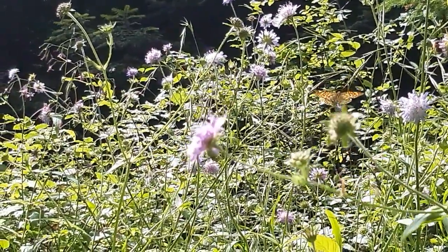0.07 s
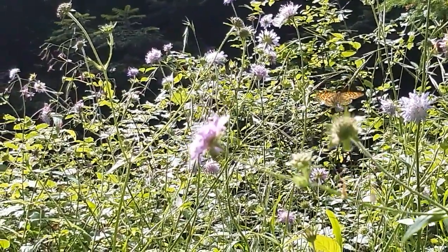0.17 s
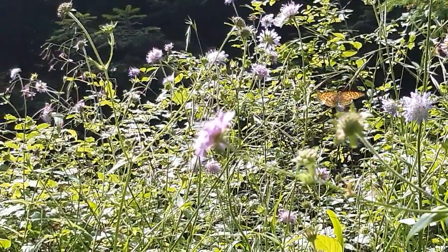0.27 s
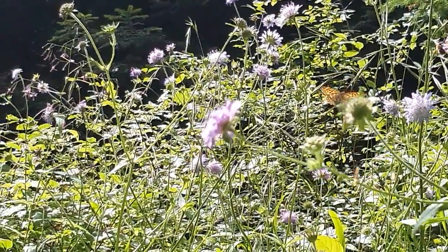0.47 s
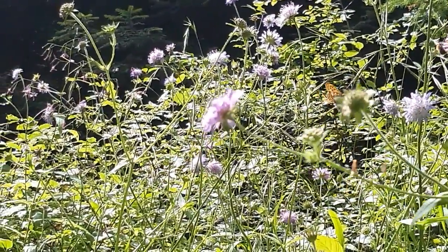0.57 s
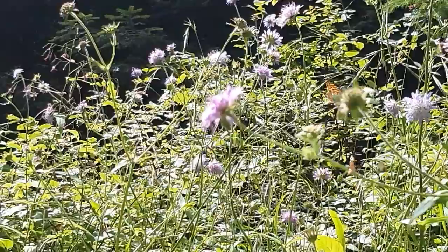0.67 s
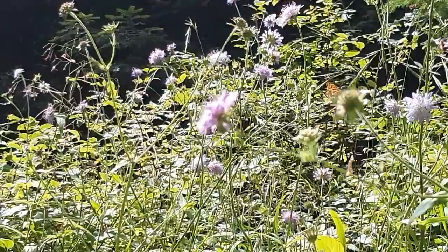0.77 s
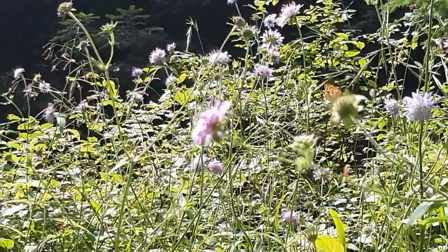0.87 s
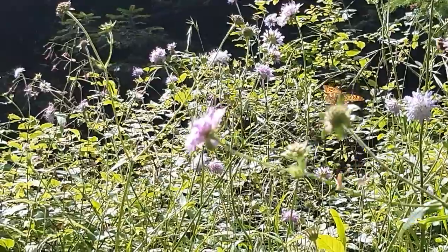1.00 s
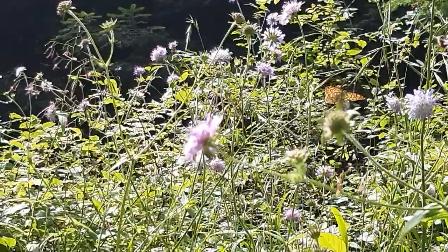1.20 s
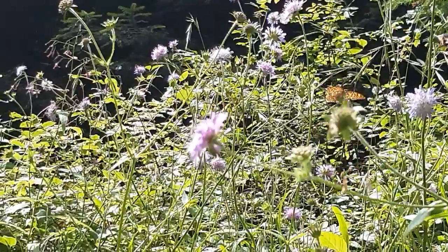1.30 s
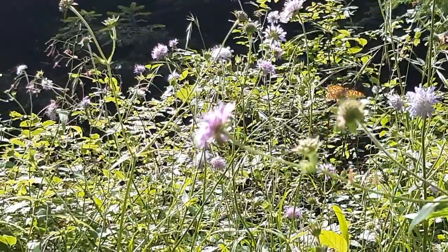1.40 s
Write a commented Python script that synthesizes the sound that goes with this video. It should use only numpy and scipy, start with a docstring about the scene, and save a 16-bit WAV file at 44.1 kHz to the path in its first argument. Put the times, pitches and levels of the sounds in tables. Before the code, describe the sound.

An insect's low, slightly raspy buzz passes close on the right, dips, swells again on the left and fades away. Behind it, light wind brushes the microphone and another insect hums faintly in a quiet meadow.

```python
"""A sunny meadow: a hoverfly or bee flies close past the right microphone port, then the left, and leaves.
Each wingbeat radiates a pressure pulse, whose repetition gives a harmonic buzz, and throws off a puff
of hiss; the wake stirs the air at the ports. A second, lower insect hums farther off,
over light wind and the faint hush of the meadow."""
import sys
import numpy as np
from scipy import signal
from scipy.fft import rfft, irfft
from scipy.io import wavfile
from scipy.ndimage import uniform_filter1d

SR = 44100
rng = np.random.default_rng(int(sys.argv[2]) if len(sys.argv) > 2 else 0)


def dump_mix(stems):
    """Bounce the given channels to the path in sys.argv[1] as a 16-bit WAV at rate SR."""
    frames = np.atleast_2d(stems).T  # one column per channel
    limited = np.clip(frames, -1, 1)  # hard clip at full scale
    pcm = np.round(limited * 32767).astype(np.int16)
    wavfile.write(sys.argv[1], SR, pcm)


N = 63945
TIME = np.arange(N) / SR
PUFF_PHASE = 0.13  # fraction of a wingbeat from pulse to puff

# Unsteadiness of flight, least in the passes, greatest hovering between them: t/s, roughness (0 to 1)
ROUGHNESS = [(0,.4),(.25,.4),(.42,.25),(.53,.6),(.72,.6),(.79,.4),(.87,.35),(.92,.45),(1.0,.5)]


def passing_insect():
    """A common source: one wingbeat phase drives the close buzz, hiss, churned air and distant buzz."""
    # Wingbeat rate: t/s, f/Hz
    wingbeat = [(0,176.3),(.16,181.6),(.19,171.1),(.225,185.3),(.26,174.4),(.3,178.8),(.38,170.1),(.455,172.1),(.53,177),(.585,169.2),(.64,173.2),(.7,162.9),(.785,180.9),(.88,172.3),(.915,158.4),(.97,178.9),(1.05,173.4),(1.45,173)]
    # Swell of the pass at each port: t/s, fundamental gain/dB, overtone gain/dB
    pass_left = [(0.3, -39, -37), (0.5, -30, -59), (0.68, -16.5, -16.5), (0.8, -1.1, -0.4), (0.87, 2.1, 0),
                 (0.92, -7.5, -2), (0.96, -25, -22.5), (1.05, -53, -52)]
    pass_right = [(0.0, -47, -36), (0.2, -14.5, -23), (0.27, -2, -7.5), (0.35, 4.7, 2.2), (0.42, 3.7, -2),
                  (0.53, -7.5, -9), (0.62, -26, -13), (0.72, -38.5, -19), (0.8, -54.5, -46),
                  (1.0, -63, -65.5)]
    # Wing pulse spectrum at closest approach: harmonic number, relative level/dB
    pulse_left = [(1,-32),(2,-35),(3,-41),(4,-54),(5,-53),(6,-55.5),(7,-58),(9,-62),(11,-67),(13,-69),(16,-77),(22,-88)]
    pulse_right = [(1,-31.5),(2,-31),(3,-37.5),(4,-45.5),(5,-48),(6,-60),(7,-48.5),(9,-59),(11,-59.5),(12,-57.5),(13,-73.5),(15,-77.5),(17,-77),(22,-86.5)]
    # Envelope of the wing hiss: t/s, relative level/dB
    hiss_left = [(0.0, -76), (0.4, -62.5), (0.72, -67.5), (0.82, -50.5), (0.92, -59.5), (1.0, -60),
                 (1.16, -76.5), (1.45, -79.58)]
    hiss_right = [(0.0, -101), (0.21, -74.741), (0.3, -55), (0.39, -51), (0.51, -58.5), (0.62, -71.209),
                  (1.0, -93), (1.45, -123)]
    # Spectrum of the wing hiss: f/Hz, relative level/dB
    colour_left = [(150,8),(500,8),(1000,4),(2200,2),(3000,-1),(4000,-2),(5000,1),(6500,2),(8500,-3),(12000,-1),(15500,0)]
    colour_right = [(150,10),(500,7),(1000,3),(2200,-1),(3000,1),(4000,0),(6500,-3),(8200,3),(10300,-4),(12000,0),(15500,-1)]
    jitter = 0.008 * in_time(ROUGHNESS)[0] * drift(rate_hz=70)
    cycles = np.cumsum(in_time(wingbeat)[0] * (1 + jitter)) / SR
    left = close_buzz(pass_left, pulse_left, cycles).sum(0)
    left += wing_hiss(hiss_left, colour_left, cycles)
    right = wing_directivity(close_buzz(pass_right, pulse_right, cycles)).sum(0)
    right += wing_hiss(hiss_right, colour_right, cycles)
    left += churned_air(pass_left, cycles)
    right += churned_air(pass_right, cycles)
    return np.array([left, right]) + distant_buzz(cycles)


def wing_harmonics(pulse, cycles, count=23):
    """Fourier series, a row per harmonic, of a minimum-phase pulse: it strikes at once and rings out."""
    number, level_db = np.transpose(pulse)
    orders = np.arange(2 * count + 1)
    rolloff_db = 2 * np.maximum(orders - number[-1], 0)
    gain = from_db(np.interp(orders, number, level_db) - rolloff_db)
    gain[0] = gain[1] / 10
    log_spectrum = np.log(np.r_[gain, gain[-2:0:-1]])
    phase = -signal.hilbert(log_spectrum).imag
    flutter_db = 4 * in_time(ROUGHNESS)[0]  # spread from the fifth harmonic up, less below
    partials = []
    for k in range(1, count + 1):
        flutter = from_db(flutter_db * min(k / 5, 1) * drift(rate_hz=35))
        partials.append(np.sqrt(2) * gain[k] * flutter * np.cos(2 * np.pi * k * cycles + phase[k]))
    return np.array(partials)


def close_buzz(swell, pulse, cycles):
    """Near field: close by, the fundamental and the very top swell faster than the middle overtones."""
    fundamental_db, overtone_db = in_time(swell)
    partials = wing_harmonics(pulse, cycles)
    # Share of the overtone curve that each harmonic follows
    upper_share = np.interp(np.arange(3, len(partials) + 1), [9, 18], [1, 0])
    share = np.r_[0, 0.67, upper_share][:, None]
    return partials * from_db(fundamental_db + share * (overtone_db - fundamental_db))


def wing_directivity(partials):
    """Directivity: as the insect turns, nulls of single harmonics sweep over the right port."""
    # Nasal rasp that leads the pass: t/s, gain/dB
    rasp = [(.2,-13),(.25,3.5),(.3,-1),(.39,-3.5),(.52,-1.5),(.6,-5),(.72,0)]
    # Quiet directions of the wings: harmonic number, t/s, width/s, depth/dB
    nulls = [(2, 0.479, 0.016, 22), (3, 0.381, 0.027, 42), (7, 0.258, 0.044, 40), (7, 0.486, 0.059, 15),
             (4, .49, 0.0095, 48)]
    gain_db = np.zeros(partials.shape)
    gain_db[7:13] = in_time(rasp)[0]  # harmonics 8 to 13
    for harmonic, centre_s, width_s, depth_db in nulls:
        gain_db[harmonic - 1] -= depth_db * np.exp(-np.abs(TIME - centre_s) / width_s)
    return partials * from_db(gain_db)


def wing_hiss(envelope, colour, cycles):
    """Flow noise: each wingbeat throws off a puff of uneven strength, followed by a decaying wake."""
    # The finest hiss, which lingers in the wake: f/Hz, relative level/dB
    sheen_colour = [(2000,-43),(5000,-26),(9000,-28),(12000,-3),(14500,2.5)]
    puff_decay_beats, wake_decay_beats, sheen_lag_s = 0.1, 0.9, 0.093
    beat, age = np.divmod(cycles - PUFF_PHASE + 2, 1)
    strength = from_db(1.3 * rng.standard_normal(N))[beat.astype(int)]
    puff = strength * np.exp(-age / puff_decay_beats)
    wake = 0.8 * np.exp(-age / wake_decay_beats)
    pulsation = unit_rms(uniform_filter1d(puff + wake, size=16))
    level_db = in_time(envelope)[0]
    sheen = from_db(delayed(level_db, sheen_lag_s) - 7) * noise(sheen_colour)
    hiss = from_db(level_db) * noise(colour)
    return from_db(-6) * pulsation * (hiss + sheen)


def churned_air(swell, cycles):
    """Amplitude modulation: churned air rushes at each stroke, growing with overtones and roughness."""
    # Spectrum of the rush: f/Hz, relative level/dB
    colour = [(150,-11),(550,7),(1200,2),(2000,-5),(2900,-35.5),(5000,-36.5)]
    stroke = unit_rms(np.exp(np.cos(2 * np.pi * (cycles - PUFF_PHASE))))
    overtone_db = in_time(swell)[1]
    return from_db(overtone_db - 39) * in_time(ROUGHNESS)[0] ** 2 * stroke * noise(colour)


def distant_buzz(cycles):
    """Far field: the same wingbeat carries over the meadow as a thinner buzz."""
    # Envelope of the distant buzz: t/s, left gain/dB, right gain/dB
    envelope = [(0,-8,-1.5),(.1,0,-1.5),(.2,-5,7),(.42,2.5,17),(.6,0,-30.5),(.92,-8.5,-16),(1.0,-3,-48),(1.1,-1.5,-27),(1.24,-28,-31),(1.45,-30.5,-33)]
    # Wing pulse spectrum at a distance: harmonic number, relative level/dB
    pulse_left = [(1,-69),(2,-64),(3,-62.5),(4,-77),(5,-65.5),(7,-87),(9,-78),(11,-84.5),(13,-85.5),(16,-92)]
    pulse_right = [(1,-67.5),(2,-67.5),(3,-79.5),(4,-74),(5,-67.5),(6,-71),(7,-110.5),(9,-77.5),(12,-125),(16,-102)]
    # The lowest two partials trade strength on the left: t/s, fundamental gain/dB, octave gain/dB
    trade_left = [(.11,17,3),(.2,-11,5),(.42,-29,10.5),(.5,2,10.5),(1.0,1,2.5),(1.08,15.5,-8),(1.3,30,-6)]
    left = wing_harmonics(pulse_left, cycles, count=16)
    left[:2] *= from_db(in_time(trade_left))
    right = wing_harmonics(pulse_right, cycles, count=16)
    return from_db(in_time(envelope)) * np.array([left.sum(0), right.sum(0)])


def low_insect():
    """Path difference: a nearly pure hum from the flowers on the left reaches the right port later."""
    # Envelope of the hum: t/s, level/dB
    envelope = [(0, -68.5), (.1, -63), (.22, -65.5), (.42, -51.5), (.6, -57), (.77, -54), (.9, -60),
                (1.0, -63.5), (1.25, -68.5), (1.37, -61.5), (1.45, -65.5)]
    # Wing pulse spectrum: harmonic number, relative level/dB
    pulse = [(1, -0.5), (2, -15.5), (3, -24.5), (5, -24)]
    wingbeat_hz, wander, port_lag_s = 124.74, 0.00653, 0.00016
    cycles = np.cumsum(wingbeat_hz * (1 + wander * drift(rate_hz=6.6))) / SR
    hum = from_db(in_time(envelope)[0]) * wing_harmonics(pulse, cycles, count=8).sum(0)
    return np.array([hum, delayed(hum, port_lag_s)])


def wind():
    """Flow noise: light wind rumbles at the two ports, partly correlated between them."""
    # Gusts: t/s, level/dB
    gusts = [(0,-66.5),(.11,-63),(.16,-61.5),(.24,-56),(.55,-58.5),(.68,-60),(.76,-59.5),(.84,-61),(.92,-56.5),(1.03,-68.5),(1.12,-62),(1.45,-86)]
    # Spectrum of the rumble: f/Hz, relative level/dB
    colour = [(20, -26.5), (35, -14.5), (50, 1), (75, -3.5), (110, -1), (250, -8), (600, -11.5),
              (2000, -39.5)]
    return from_db(in_time(gusts)[0]) * stereo_noise(colour, correlation=0.32)


def meadow_hush():
    """Ambient noise: a faint, stationary hush, weakly correlated between the ports."""
    # Spectrum of the hush: f/Hz, relative level/dB
    colour = [(30,0.5),(100,5.5),(200,-4.5),(300,5),(410,-18.5),(600,-3),(1000,-5.5),(1500,-11.5),(3000,-25),(9000,-34.5),(15500,-21.5)]
    return from_db(-68.5) * stereo_noise(colour, correlation=0.17)


def stereo_noise(colour, correlation):
    """Partial coherence: two noises share the given fraction of their power."""
    common = noise(colour)
    separate = np.array([noise(colour), noise(colour)])
    return np.sqrt(correlation) * common + np.sqrt(1 - correlation) * separate


def noise(colour):
    """Spectral shaping: white noise takes the given colour, at unit rms."""
    hz, level_db = np.transpose(colour)
    log_hz = np.log(np.fft.rfftfreq(N, 1 / SR) + 1)
    gain = from_db(np.interp(log_hz, np.log(hz), level_db))
    return unit_rms(irfft(rfft(rng.standard_normal(N)) * gain, N))


def drift(rate_hz):
    """Random fluctuation: noise through a two-pole low-pass, at unit rms."""
    hop, settle = 40, 2000  # samples per step, steps for the filter to settle
    pole = np.exp(-2 * np.pi * rate_hz * hop / SR)
    white = rng.standard_normal(N // hop + settle + 2)
    slow = signal.lfilter([1], [1, -2 * pole, pole * pole], white)[settle:]
    return np.interp(np.arange(N) / hop, np.arange(len(slow)), unit_rms(slow))


def in_time(rows):
    """Linear interpolation of each column after t/s, sample by sample."""
    times, *columns = np.transpose(rows)
    return [np.interp(TIME, times, column) for column in columns]


def delayed(x, lag_s):
    """Time delay, by interpolation between samples."""
    return np.interp(TIME - lag_s, TIME, x)


def from_db(db):
    """Amplitude ratio of a level in decibels."""
    return 10 ** (np.asarray(db) / 20)


def unit_rms(x):
    """Normalisation to unit mean power."""
    return x / np.sqrt(np.mean(x ** 2) + 1e-20)


def scene():
    """Superposition: the pressures of both insects, the wind and the meadow add at each port."""
    return passing_insect() + low_insect() + wind() + meadow_hush()


def record(dry):
    """Band limiting: an elliptic low-pass cuts the highest treble steeply."""
    cutoff_hz = 15900
    return signal.sosfilt(signal.ellip(10, 0.1, 80, cutoff_hz, fs=SR, output="sos"), dry)


dry = scene()
out = record(dry)
dump_mix(out)
```